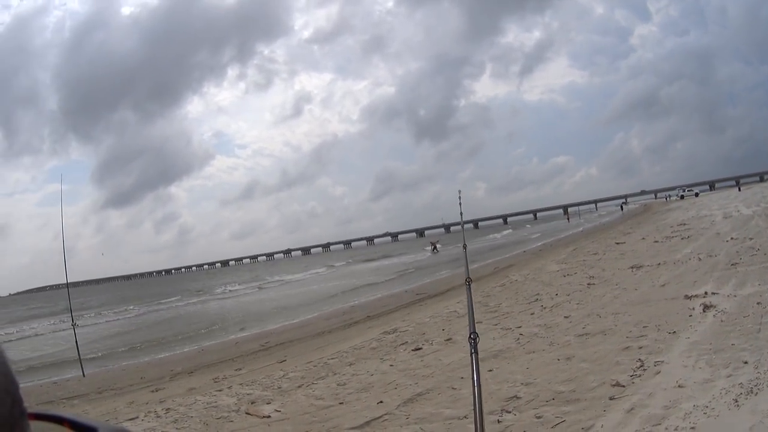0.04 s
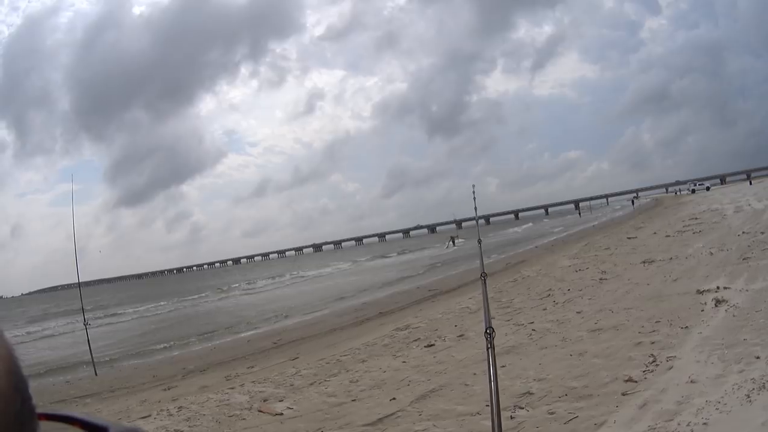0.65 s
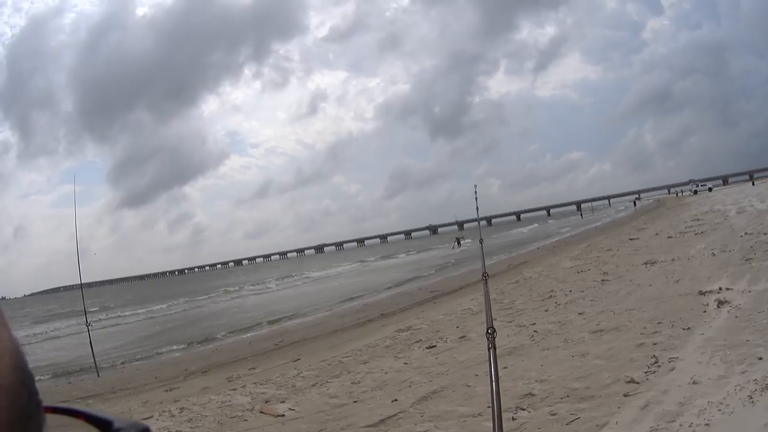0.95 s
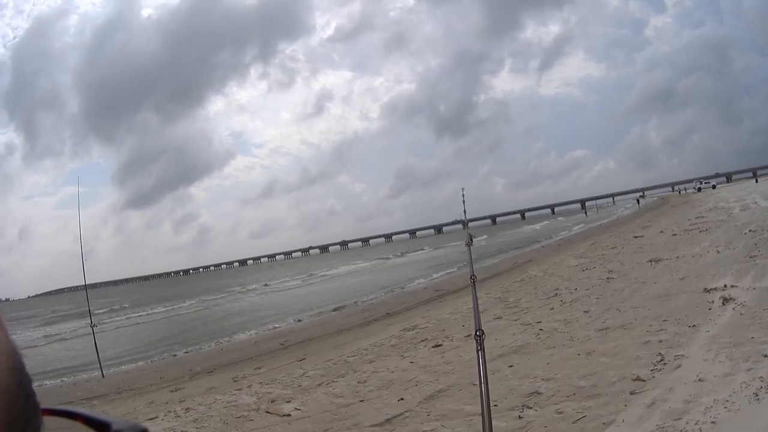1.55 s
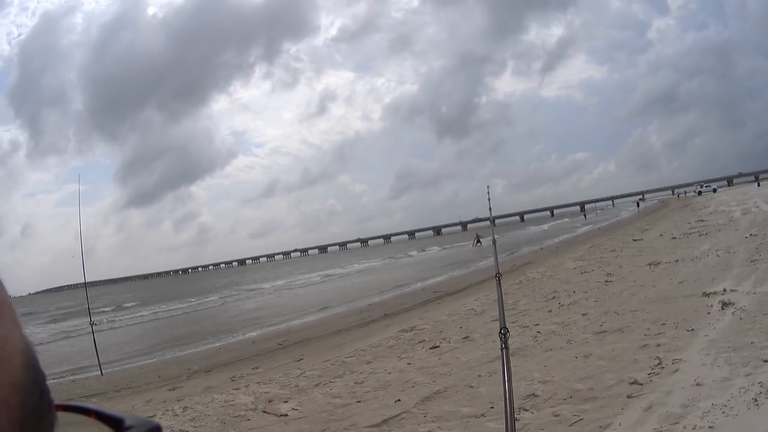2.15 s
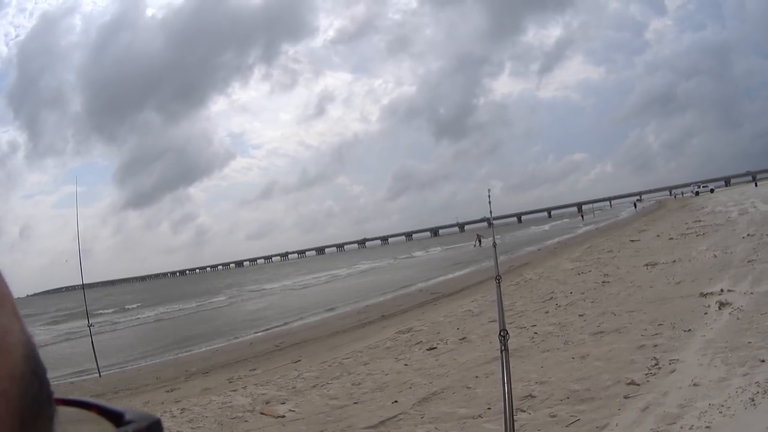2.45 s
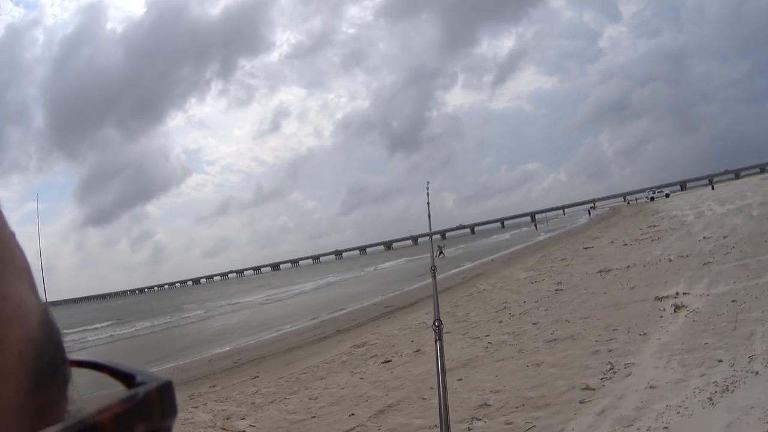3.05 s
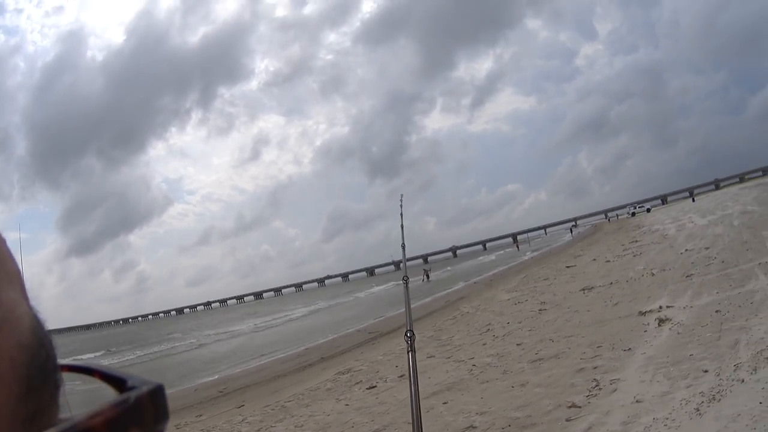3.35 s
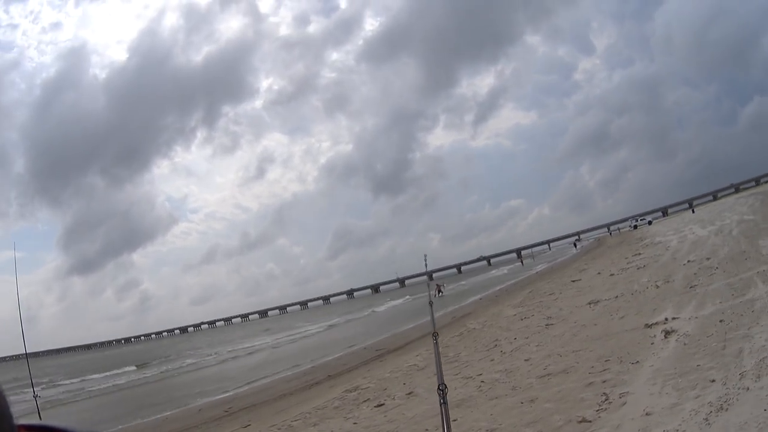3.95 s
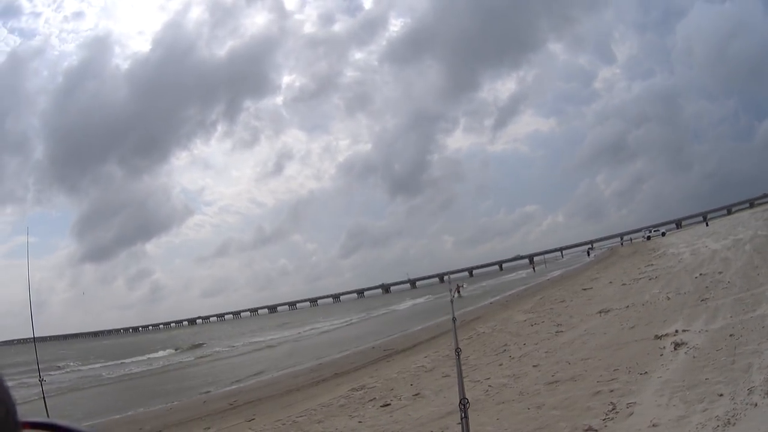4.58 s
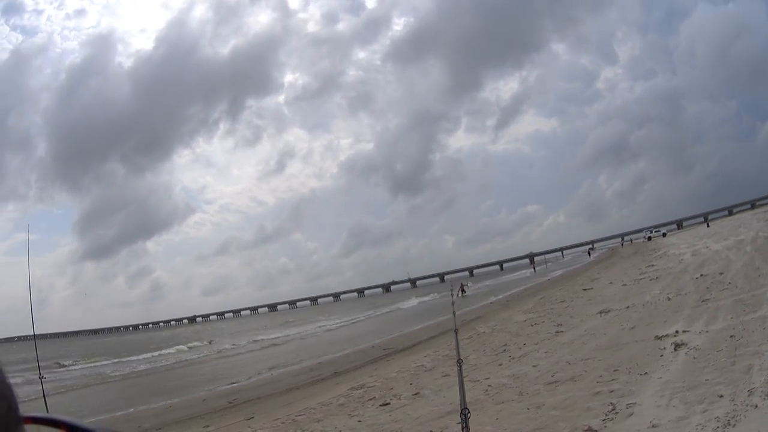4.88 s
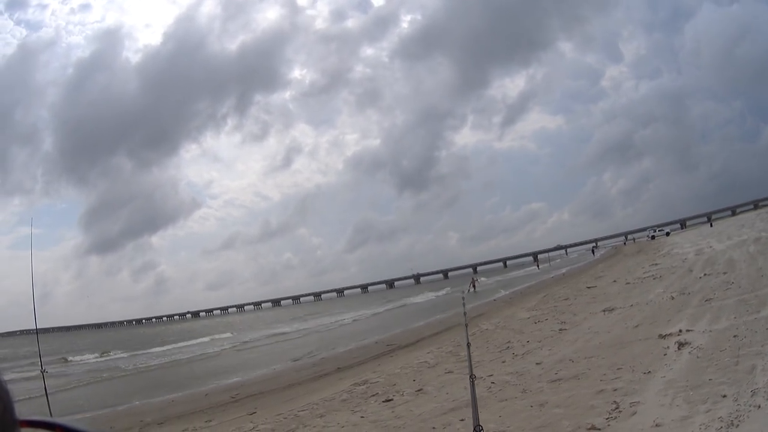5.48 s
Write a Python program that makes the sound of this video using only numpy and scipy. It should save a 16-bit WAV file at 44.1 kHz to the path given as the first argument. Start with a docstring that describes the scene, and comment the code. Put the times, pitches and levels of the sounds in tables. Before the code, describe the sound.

A fishing reel's drag buzzes in several runs and single clicks, with wind thumping on the microphone and surf behind.

```python
"""A fish pulls line off a reel on a windy beach, close to a body-worn camera.
From the start, surf washes behind and turbulent puffs of wind thump on the two microphone ports.
In the first three seconds the line runs three times: the drag's pawl snaps over the spool's teeth,
and its train of impulses rings the reel as a buzz. From 3.6 s the line creeps in single clicks.
From 4.6 s come three short runs, the last the fastest, while the surf swells."""
import sys
import numpy as np
from scipy import signal
from scipy.fft import rfft, irfft
from scipy.io import wavfile
from scipy.ndimage import uniform_filter1d, map_coordinates

SR = 44100
rng = np.random.default_rng(int(sys.argv[2]) if len(sys.argv) > 2 else 0)


def waveform_to_disk(signal):
    """Save audio, clipped to [-1, 1], as 16-bit WAV at the path in sys.argv[1]."""
    frames = np.transpose(np.atleast_2d(signal))
    scaled = np.clip(frames, -1, 1) * 32767
    samples = np.round(scaled).astype(np.int16)
    wavfile.write(sys.argv[1], SR, samples)


N = 243431
TIME = np.arange(N) / SR
HZ = np.fft.rfftfreq(N, 1 / SR)
BAND_LIMIT_HZ = 11080
# phase by which the left channel leads the right: frequency_hz, lead_rad
CHANNEL_LEAD = [(40, 0.29), (150, -1.25), (550, 0.0014), (1200, -0.69), (2500, -0.7), (5000, -0.43),
                (8000, -0.19), (11000, -.08)]


def gain_of(db):
    """The decibel scale: amplitude grows tenfold every 20 dB."""
    return 10 ** (np.asarray(db) / 20)


def unit_rms(x):
    """Normalisation to a mean power of 1."""
    return x / np.sqrt(np.mean(x ** 2) + 1e-20)


def at_hz(spectrum, hz=HZ):
    """Interpolation of (frequency_hz, value) rows on a logarithmic frequency axis."""
    frequency_hz, value = np.transpose(spectrum)
    return np.interp(np.log(hz + 1), np.log(frequency_hz + 1), value)


def at_time(curve, t=TIME):
    """Linear interpolation of (time_s, value) rows."""
    return np.interp(t, *np.transpose(curve))


def add(mix, start_s, sound):
    """Superposition: a sound adds to the mix from start_s on."""
    part = mix[..., max(round(start_s * SR), 0):][..., :sound.shape[-1]]
    part += sound[..., :part.shape[-1]]


def bell(peak_s, width_s, lean=0):
    """Gaussian pulse, width_s wide at half height; with lean (0-1) it rises faster than it falls."""
    t = TIME - peak_s
    half_width_s = width_s * (1 + lean * np.sign(t)) / 2
    return np.exp2(-np.minimum((t / half_width_s) ** 2, 100))


def port_spectra(sources, coherence, lead_rad=0, balance_db=0):
    """Partial coherence: a sum and a difference of two unrelated signals reach the two ports."""
    first, second = rfft(sources)
    likeness = np.clip(at_hz(coherence), -1, 1)
    common = np.sqrt((1 + likeness) / 2) * first
    opposed = np.sqrt((1 - likeness) / 2) * second
    to_left = np.exp(1j * lead_rad / 2) * gain_of(balance_db / 2)
    return np.array([(common + opposed) * to_left, (common - opposed) / to_left])


def patchy(x, depth_db, frames, bins):
    """Random amplitude modulation: patches of the short-time spectrum swell and fade."""
    spectra = signal.stft(x, nperseg=1024)[2]
    patches = uniform_filter1d(rng.standard_normal(spectra.shape[1:]), bins, axis=0)
    patches = unit_rms(uniform_filter1d(patches, frames, axis=1))
    return signal.istft(spectra * gain_of(depth_db * patches))[1][:, :N]


def surf():
    """Small breakers sum incoherently to broadband noise, with faint patches of foam hiss."""
    # spectral density of the wash: frequency_hz, level_db
    spectrum = [(25, -15), (45, -0.5), (110, 0.5), (300, -10.5), (600, 0.5), (950, -1), (1350, -2.5),
                (2000, -1.5), (2700, -8), (3400, -12), (4000, -12), (5200, -19.5), (6800, -23), (8300, -25),
                (9500, -36.5), (11000, -40)]
    # slow swell of the surf: time_s, level_db
    swell = [(0.2, -32.5), (.7, -30.5), (1.5, -27.5), (2.65, -29), (3.35, -30), (4, -28.5), (4.6, -28.5),
             (5.52, -25.5)]
    # likeness of the surf at the two ports: frequency_hz, coherence
    coherence = [(60, 1), (130, 0.98), (300, 0.25), (600, 1), (1200, 0.71), (2600, 0.88), (6000, 0.91),
                 (11000, 1)]
    noise = port_spectra(rng.standard_normal((2, N)), coherence, at_hz(CHANNEL_LEAD))
    wash = irfft(noise * gain_of(at_hz(spectrum)), N)
    wash = patchy(wash, depth_db=.7, frames=7, bins=12)
    return unit_rms(wash) * gain_of(at_time(swell))


def wind_strength_db():
    """Envelope of the wind: a slow trend with brief lulls."""
    # trend of the wind's strength: time_s, level_db
    breeze = [(0.05, -28.5), (0.3, -28.5), (1.1, -23.5), (1.65, -29.5), (2.05, -21.5), (2.35, -26),
              (2.66, -22.5), (3.0, -25), (3.55, -24.5), (4.0, -28), (4.55, -29), (4.85, -23.5), (5.52, -25)]
    # momentary drops of the wind: centre_s, depth_db, width_s
    lulls = [(0.168, -8, 0.056), (0.31, -4, .04), (0.487, -9, 0.025), (0.659, -13, 0.038),
             (1.697, -5, 0.044), (1.973, -9, 0.072), (2.285, -4, 0.019), (2.354, -12, .035),
             (2.48, -6, .025), (2.895, -19, 0.042), (3.127, -8, 0.11), (3.289, -12, 0.024),
             (3.417, -13, 0.023), (3.677, -7, 0.049), (3.99, -6, 0.069), (4.652, -9, .04)]
    return at_time(breeze) + sum(db * bell(centre_s, width_s) for centre_s, db, width_s in lulls)


def eddies(corner_hz, tilt_db_per_octave, levelling):
    """Turbulent pressure on the ports is low-pass noise; levelling (0-1) evens out its chance swells."""
    # spectral density of the turbulence: frequency_hz, level_db
    spectrum = [(15, -36), (25, -38), (60, -9), (165, 0.5), (237, 1), (491, -3), (954, -11.5), (1100, -15),
                (1430, -16), (2420, -120)]
    # likeness of the turbulence at the two ports: frequency_hz, coherence
    coherence = [(60, 0.95), (130, 0.89), (270, 0.5), (580, -0.22), (1200, -0.36)]
    tilt_db = tilt_db_per_octave * np.log2(np.maximum(HZ, 20) / corner_hz)
    colour = gain_of(at_hz(spectrum) + tilt_db) / np.hypot(1, (HZ / corner_hz) ** 2)
    noise = port_spectra(rng.standard_normal((2, N)), coherence)
    pressure = unit_rms(irfft(noise * colour, N))
    local_power = uniform_filter1d((pressure ** 2).mean(0), size=450) + 1e-9
    return unit_rms(pressure / local_power ** (levelling / 2))


def lesser_puffs(per_s=9, above_wind_db=2.5, spread_db=2, width_s=0.0064, edge_db=0):
    """Intermittency: random puffs follow the wind's strength. Rows: peak_s, level_db, width_s, edge_db."""
    count = int(N / SR * per_s)
    peak_s = (np.arange(count) + rng.random(count)) / per_s
    level_db = np.interp(peak_s, TIME, wind_strength_db()) + above_wind_db
    level_db -= spread_db * rng.standard_normal(count)
    return np.c_[peak_s, level_db, np.full(count, width_s), np.full(count, edge_db)]


def wind(rumble_db=-1.5, wake_db=-11, edge_from_hz=440):
    """Turbulence makes a dull rumble and short puffs, each with a weaker wake; the puffs add in power."""
    # strongest puffs, whose edge is the part above edge_from_hz: peak_s, level_db, width_s, edge_db
    strong_puffs = [(.233, -17.5, .013, -12), (.449, -18, 0.014, -1), (.525, -21, 0.029, -4),
                    (.575, -26, 0.041, -1), (.762, -13.5, 0.014, -2), (.873, -20.5, .013, -5),
                    (.948, -17.5, 0.013, -3), (.978, -22, 0.025, 3.5), (1.01, -14, 0.015, -1),
                    (1.165, -26.5, 0.0097, 6), (1.228, -31, 0.0082, 0), (1.333, -17, 0.0089, -16),
                    (1.402, -16.5, 0.03, -6), (1.465, -20, .009, -14), (1.586, -6, .0078, -5.5),
                    (1.742, -13.5, .0074, -11), (1.786, -15.5, 0.0075, -7), (1.88, -14.5, 0.019, 4),
                    (1.92, -19.5, 0.013, -7), (2.018, -17.5, 0.018, 1), (2.08, -17.5, 0.0076, 1),
                    (2.131, -19.5, 0.02, 4), (2.215, -13.5, 0.024, -6), (2.318, -16.5, 0.0082, 4.5),
                    (2.408, -16.5, 0.0057, -2), (2.504, -10, 0.0029, -2), (2.519, -12, 0.004, 4.5),
                    (2.585, -9, 0.0059, -2), (2.618, -16, .015, 0), (2.638, -19, 0.014, 1),
                    (2.662, -15, 0.014, -7), (2.69, -15, 0.01, 8), (2.713, -12.5, 0.0092, 5),
                    (2.733, -13, 0.013, 0), (2.78, -22, 0.011, -5), (2.832, -19.5, 0.011, -4),
                    (2.86, -16, .012, -7), (2.937, -19.5, 0.0091, -8), (3.012, -12.5, 0.01, -5),
                    (3.038, -16, 0.022, 3.5), (3.187, -19, 0.006, -1), (3.228, -24, 0.016, -1),
                    (3.33, -19, 0.015, -7), (3.365, -19.5, 0.015, -8), (3.41, -17.5, 0.0083, -9),
                    (3.499, -11, 0.0064, -6), (3.525, -7, .011, 1.5), (3.582, -21, .012, -1),
                    (3.73, -21.5, 0.013, -1), (3.822, -17.5, 0.016, 0), (3.888, -18, 0.023, -0.5),
                    (3.926, -10, 0.015, 0.5), (4.076, -9, 0.005, -3), (4.103, -7.5, 0.022, -7),
                    (4.136, -9, .012, -3.5), (4.167, -16, .0058, 4), (4.226, -20, 0.0055, -4),
                    (4.297, -10.5, 0.021, -3), (4.506, -17, 0.0067, -4), (4.539, -14.5, 0.0068, 2.5),
                    (4.597, -24.5, 0.016, -4), (4.72, -21, .009, -5), (4.745, -23, 0.0057, -10),
                    (4.836, -12, 0.015, -4), (4.928, -10, 0.008, -5), (4.95, -15.5, 0.011, 5),
                    (5.051, -17.5, 0.0087, 3), (5.09, -15.5, .007, -3), (5.17, -18, 0.027, 5.5),
                    (5.243, -13.5, 0.013, -2.5), (5.298, -16.5, 0.023, 6), (5.318, -20, .009, 4),
                    (5.36, -13.5, 0.0081, -2), (5.425, -26, 0.01, -12), (5.478, -17, .012, -10)]
    dull_power, edge_power = np.zeros((2, N))
    for peak_s, level_db, width_s, edge_db in np.vstack([strong_puffs, lesser_puffs()]):
        wake = gain_of(wake_db) ** 2 * bell(peak_s + width_s, 2 * width_s)
        power = gain_of(level_db) ** 2 * (bell(peak_s, width_s, lean=.3) + wake)
        dull_power += power
        edge_power += gain_of(edge_db) ** 2 * power
    # nearly level, so that each puff lands with its own force
    pressure = eddies(corner_hz=1200, tilt_db_per_octave=0.8, levelling=0.92)
    dull = irfft(rfft(pressure) / (1 + (HZ / edge_from_hz) ** 4), N)
    puffs = np.sqrt(dull_power) * dull + np.sqrt(edge_power) * (pressure - dull)
    rumble = eddies(corner_hz=796, tilt_db_per_octave=-1, levelling=0.099)
    return gain_of(wind_strength_db() + rumble_db) * rumble + puffs


def judder(rms_s=.00012):
    """Speed wobble: the spool turns slightly unevenly, running ahead and behind in time."""
    rates_hz = np.geomspace(7, 24, 12)
    wobble = sum(np.sin(2 * np.pi * (hz * TIME + rng.random())) / np.sqrt(hz) for hz in rates_hz)
    return rms_s * unit_rms(wobble)


def tooth_strikes(run, force, cruise_teeth_per_s=122.7, skim_teeth_per_s=194):
    """Tooth-passing rate: one click per tooth, its strength set by speed. Rows: time_s, level_db."""
    t = np.arange(run[0][0], run[-1][0], 1 / SR)
    teeth_passed = np.cumsum(at_time(run, t)) / SR
    notches = np.linspace(0, teeth_passed[-1], round(teeth_passed[-1]) + 1)  # it comes to rest in a notch
    strike_s = np.interp(notches, teeth_passed, t)
    speed = at_time(run, strike_s)
    flick_db = 4 * np.log2(speed / cruise_teeth_per_s)  # a faster spool flicks the pawl harder
    skim_db = -3 * (speed / skim_teeth_per_s) ** 2  # until the pawl only skims the teeth
    return np.c_[strike_s, at_time(force, strike_s) + flick_db + skim_db]


def snap_of(stroke):
    """An impact is brief and broadband: noise is confined to the stroke and whitened in turn."""
    snap = stroke * rng.standard_normal(len(stroke))
    for _ in range(10):
        local_rms = np.sqrt(abs(uniform_filter1d(snap ** 2, size=40)) + 1e-14)
        snap = unit_rms(stroke * np.tanh(snap / local_rms))
        snap = unit_rms(irfft(np.exp(1j * np.angle(rfft(snap)))))
    return snap


def pawl(rise_s=0.0019, fall_s=0.00257, rattle_db=-21, rattle_decay_s=.016, uneven_db=1.26):
    """Periodic impacts give pitch: the pawl snaps alike on each tooth, while its loose chatter rasps."""
    # spool speed, one curve for each run of line: time_s, speed_teeth_per_s
    runs = [
        [(0.011, 75.8), (0.041, 113.3), (0.1452, 106.7), (0.25, 42.8), (0.3771, 112.8), (0.4521, 94.6),
         (0.4898, 130.4), (0.5443, 178.8), (0.5751, 174.2), (0.6334, 131.4), (0.6855, 149.8), (0.7448, 149.0),
         (0.7701, 143.2), (0.8516, 171.0), (0.9206, 180.4), (0.9813, 158.2), (1.045, 135.7), (1.1124, 104.1),
         (1.2171, 102.1), (1.306, 52.3)],
        [(1.781, 52.1), (1.8478, 101.4), (1.8847, 51.1), (1.9924, 135.1), (2.1083, 120.5), (2.212, 99.4),
         (2.287, 29.0)],
        [(2.69, 39.8), (2.7545, 123.3), (2.8019, 142.9), (2.8804, 172.0), (2.9156, 174.4), (2.9666, 158.9),
         (3.0285, 145.8), (3.0496, 51.2), (3.078, 87.4)],
        [(4.6225, 45.3), (4.6456, 168.2), (4.6616, 167.6), (4.6845, 81.0)],
        [(5.1355, 57.9), (5.1565, 249.8), (5.1846, 250.6), (5.1996, 219.8), (5.219, 111.0)],
        [(5.292, 17.9), (5.3106, 184.4), (5.3228, 300.5), (5.3641, 302.6), (5.3969, 187.4), (5.4185, 129.2),
         (5.4518, 61.0), (5.4796, 150.1), (5.517, 232.4)],
    ]
    # force of the pawl, following the pull on the line, one curve for each run: time_s, level_db
    forces = [
        [(0, -27), (.16, -26), (.25, -26), (.44, -26), (.5, -24), (.73, -23.5), (.78, -24.5), (.83, -24),
         (1.06, -24), (1.25, -23), (1.31, -21)],
        [(1.78, -21), (1.85, -20.5), (1.9, -22), (1.97, -20.5), (2.06, -21.5), (2.2, -23), (2.29, -19)],
        [(2.69, -21), (2.79, -25), (2.83, -21), (3.0, -20), (3.03, -20), (3.08, -20)],
        [(4.62, -15), (4.635, -22), (4.65, -22.5), (4.685, -21)],
        [(5.136, -17.5), (5.145, -24), (5.16, -28.5), (5.22, -24)],
        [(5.29, -15.5), (5.305, -22.5), (5.335, -25.5), (5.37, -26), (5.44, -25), (5.52, -25.5)],
    ]
    # the spool slips by one tooth: time_s, level_db
    slips = [(3.592, -23), (3.619, -20.5), (3.743, -21.5), (3.767, -21), (3.793, -18.5), (3.815, -19),
             (3.8339, -20), (3.859, -19.5), (4.414, -19.5), (4.436, -21), (4.458, -21), (5.029, -27.5)]
    # part of a click that repeats on every tooth: frequency_hz, power_share
    repeating = [(1000, .97), (2500, .97), (3500, .9), (4500, .72), (7000, .4), (11000, .3)]
    lead_s, jitter_s, stutter_s = .004, .00002, .00035
    t = np.arange(1024) / SR - lead_s
    stroke_s = np.where(t < 0, rise_s, fall_s)  # scrapes up the tooth, then snaps down
    stroke = np.exp(-np.minimum(abs(t) / stroke_s, 9) ** 1.4)
    rattle = stroke + (t > 0) * gain_of(rattle_db) * np.exp(-abs(t) / rattle_decay_s)
    snap = snap_of(stroke)
    strikes = [tooth_strikes(run, force) for run, force in zip(runs, forces)]
    times_s, levels_db = np.vstack(strikes + [slips]).T
    starts_s = times_s + np.interp(times_s, TIME, judder()) - lead_s
    snaps, chatter = np.zeros(N), np.zeros((2, N))
    for start_s, level_db in zip(starts_s, levels_db):
        late, loose, hard = rng.standard_normal(3)
        strength = gain_of(level_db + uneven_db * hard)
        burst = unit_rms(rattle * rng.standard_normal((2, len(t))))
        add(snaps, start_s + jitter_s * late, strength * snap)
        add(chatter, start_s + stutter_s * loose, strength * burst)
    share = at_hz(repeating)
    direct = irfft(np.sqrt(share) * rfft(snaps) + np.sqrt(1 - share) * rfft(chatter[0]), N)
    scattered = chatter[1]  # the part scattered on its way to the ports
    return np.array([direct, scattered])


def reel_response(modes, shell_db):
    """Modal resonance: steep-sided peaks add in power to the broad response of the shell."""
    # broad response of the reel's shell: frequency_hz, level_db
    shell = [(200, -53), (600, -41), (1000, -4), (1800, -15), (2800, -5), (3900, -8.5), (4800, -23),
             (5700, -7), (7000, -12), (8300, -22), (9000, -16), (11000, -28)]
    hz = np.fft.rfftfreq(8192, 1 / SR)
    modal_power = sum((gain_of(level_db) / (1 + 2 * ((hz - pitch_hz) / width_hz) ** 2)) ** 2
                      for pitch_hz, width_hz, level_db in modes)
    gain = np.sqrt(modal_power + gain_of(at_hz(shell, hz) + shell_db) ** 2)
    treble = (hz > 3500) & (hz < BAND_LIMIT_HZ)
    return gain / np.sqrt(np.mean(gain[treble] ** 2))


def ring(excitation, gain):
    """Causality: a body rings only after the blow, here with the minimum phase for its gain curve."""
    log_gain = np.log(np.maximum(np.r_[gain, gain[-2:0:-1]], 1e-5))
    impulse_response = np.fft.ifft(np.exp(np.conj(signal.hilbert(log_gain)))).real
    return signal.oaconvolve(excitation, impulse_response[None, :len(gain)], axes=1)[:, :N]


def sand_echo(sound, level_db=-13, delay_s=.0086, sway_s=.0002, sway_hz=1.3):
    """Ground reflection: the path by way of the sand lengthens and shortens as the rod sways."""
    sway = np.sin(2 * np.pi * (sway_hz * TIME + rng.random()))
    emitted_at = (TIME - delay_s - sway_s * sway) * SR
    return gain_of(level_db) * np.array([map_coordinates(part, [emitted_at], order=3) for part in sound])


def reel():
    """Impulse excitation: the pawl rings the modes of reel and rod, which change with the angler's grip."""
    # modes of reel and rod under four successive grips: pitch_hz, width_hz, level_db
    first_grip = [(1006, 19, 1.5), (1604, 29, -0.5), (2065, 70, 2), (2060, 580, -1), (3080, 130, -8.5),
                  (3430, 240, -6), (4370, 360, -5.5), (4970, 640, -11.5), (6670, 170, -9.5),
                  (7220, 300, -6), (7440, 140, -7.5), (8080, 570, -7), (10310, 860, -7.5)]
    middle_grip = [(1490, 130, -3), (2130, 310, 4), (3100, 200, -4.5), (3450, 270, -4), (4200, 210, -4.5),
                   (4660, 400, -2.5), (5980, 300, -17), (6620, 200, -12), (7200, 510, -5.5),
                   (8140, 350, -2.5), (8700, 500, -12), (10250, 960, -9.5)]
    slip_grip = [(1490, 480, -2.5), (2130, 310, 0), (3080, 310, -4), (3430, 200, -2.5), (4330, 430, -0.5),
                 (4800, 290, -3), (6250, 410, -13), (7400, 870, -7), (8100, 270, -2), (8400, 330, -10),
                 (10150, 670, -12), (10950, 250, -11.5)]
    last_grip = [(996, 12, 12), (1233, 30, 7), (1487, 81, 7), (1710, 48, -1), (1750, 550, 1.5),
                 (2100, 91, 5.5), (2470, 450, -1.5), (2980, 720, -5), (3540, 280, -12), (4360, 720, -2),
                 (6200, 330, -6), (6700, 240, -3.5), (7250, 600, -5.5), (8280, 710, -6.5),
                 (10270, 1030, -7.5)]
    # the hand moves on to the next grip: start_s, end_s
    grip_changes = [(2.4, 2.7), (3.15, 3.5), (4.48, 4.62)]
    # likeness of the reel at the two ports: frequency_hz, coherence
    coherence = [(600, 0.24), (2000, 0.76), (5000, 0.89), (11000, 0.87)]
    # level of the reel at the left port over the right: frequency_hz, balance_db
    balance = [(60, -5), (110, -1), (190, 0), (350, -33), (630, 1), (1130, 1.5), (2020, -1), (3630, -2),
               (6530, -2), (11700, -0.5)]
    clicks = pawl()
    responses = [gain_of(-3) * reel_response(first_grip, shell_db=-6.5),
                 gain_of(-4.5) * reel_response(middle_grip, shell_db=-4.5),
                 gain_of(-3.5) * reel_response(slip_grip, shell_db=-4),
                 gain_of(-2) * reel_response(last_grip, shell_db=-4)]
    grip_taken = [1] + [np.interp(TIME, change, (0, 1)) for change in grip_changes] + [0]
    sound = sum(ring(clicks * (current - following), response)
                for current, following, response in zip(grip_taken, grip_taken[1:], responses))
    sound = patchy(sound, depth_db=2, frames=4, bins=9)  # modes swell and fade as the hand shifts
    sound = sound + sand_echo(sound)
    return irfft(port_spectra(sound, coherence, at_hz(CHANNEL_LEAD), at_hz(balance)), N)


def scene():
    """Superposition of reel, surf and wind at the two ports."""
    return reel() + surf() + wind()


def record(dry):
    """Automatic gain control ducks everything under the hardest puffs; a steep low-pass follows."""
    sensed_below_hz, threshold_db, excess_removed, reaction_s = 960, -18.5, 0.58, 0.004
    low_band = signal.sosfilt(signal.butter(2, sensed_below_hz, fs=SR, output="sos"), dry)
    pole = np.exp(-1 / (reaction_s * SR))
    power = signal.lfilter([1 - pole], [1, -pole], (low_band ** 2).mean(0))
    excess_db = np.maximum(10 * np.log10(power + 1e-12) - threshold_db, 0)
    ducked = dry / gain_of(excess_removed * excess_db)
    low_pass = signal.firwin(601, BAND_LIMIT_HZ, window=("kaiser", 9), fs=SR)
    return signal.oaconvolve(ducked, low_pass[None], "same")


dry = scene()
out = record(dry)
waveform_to_disk(out)
```